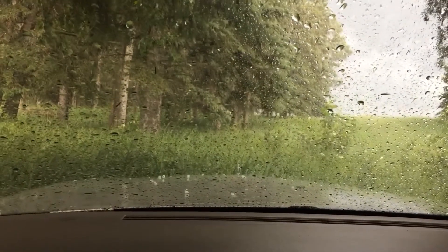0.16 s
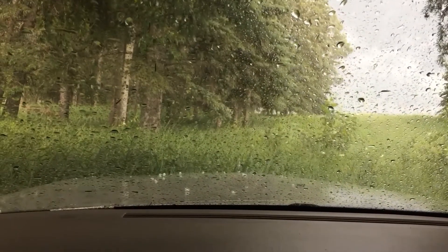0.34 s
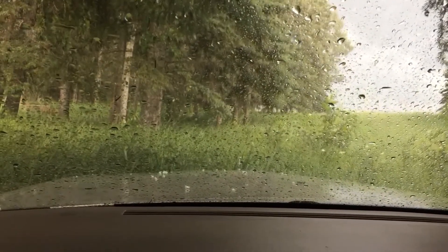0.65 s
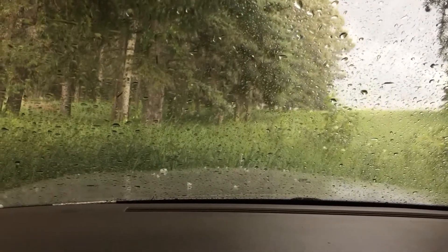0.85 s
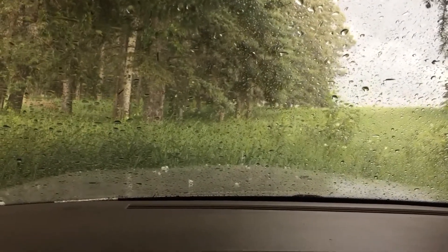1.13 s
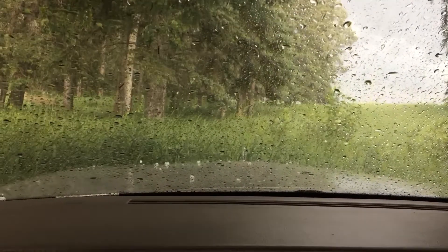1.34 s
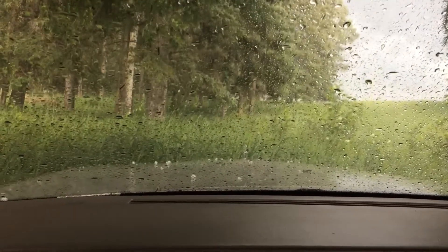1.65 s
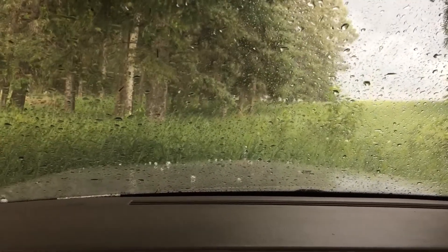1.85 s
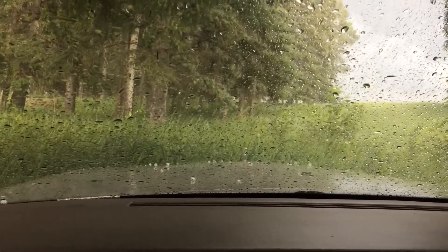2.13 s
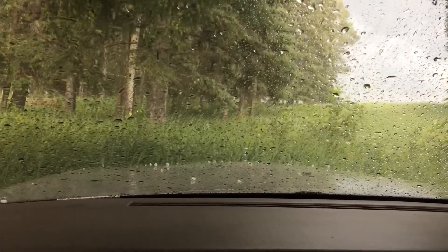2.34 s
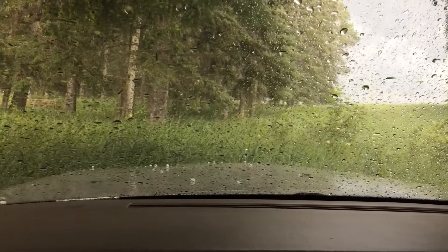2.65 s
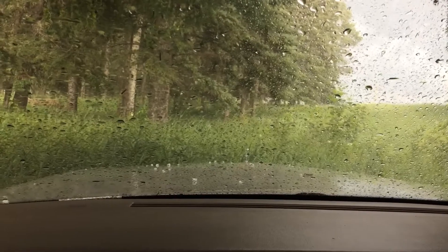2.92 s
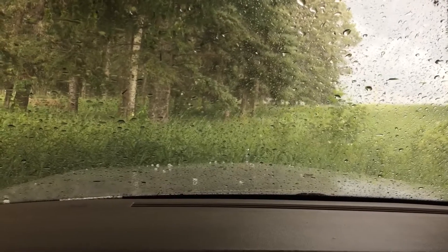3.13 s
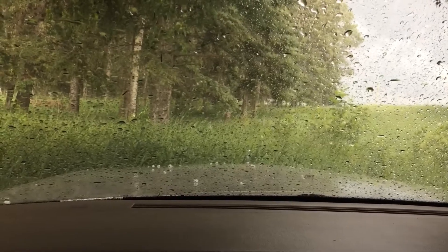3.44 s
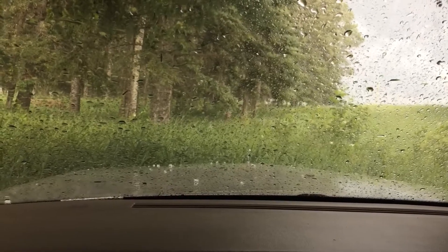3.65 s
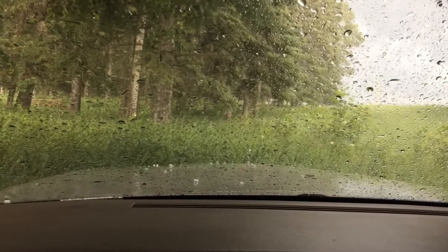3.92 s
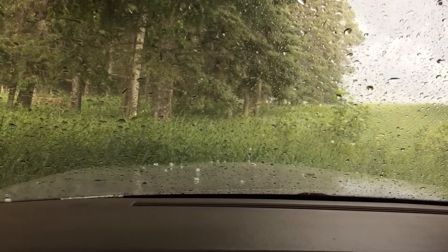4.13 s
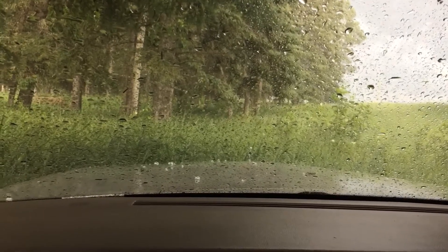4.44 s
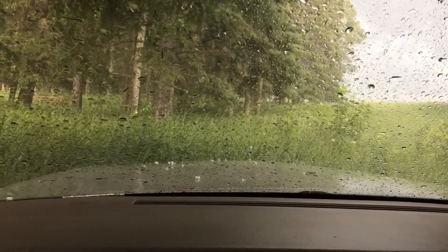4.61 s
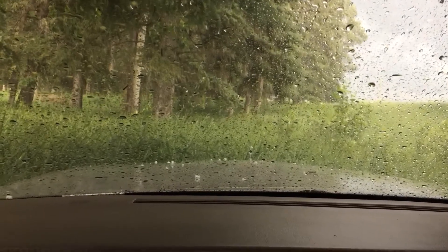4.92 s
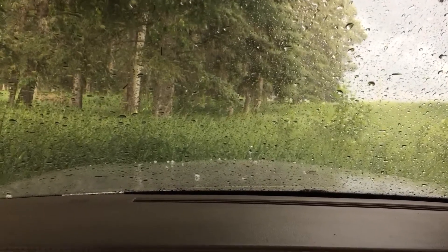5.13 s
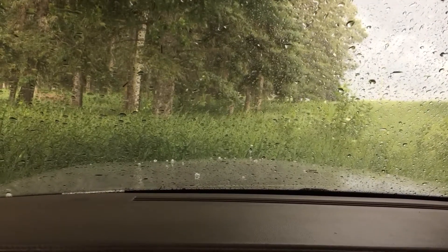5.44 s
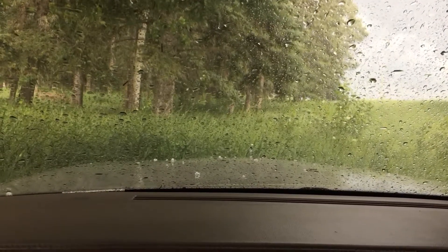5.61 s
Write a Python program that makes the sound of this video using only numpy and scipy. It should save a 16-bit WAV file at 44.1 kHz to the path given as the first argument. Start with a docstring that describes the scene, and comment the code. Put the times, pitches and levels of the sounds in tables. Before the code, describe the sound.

Heard from inside a parked car, hailstones hit windshield, hood and roof at uneven intervals, many each second. Bright glassy cracks and short ticks mix with hollow panel knocks and soft low thuds. Behind lies a faint rain patter. The clatter is dense for the first two and a half seconds, eases, picks up around four seconds, then thins to scattered taps. Close, dry cabin microphone.

```python
"""Hail on a parked car, heard in the cabin

Small far stones and drops patter behind: random fading taps of noise over a duller hush of rain.
Hard contacts of ice on glass tick as very short bright noise bursts. Each near stone rings a panel or
the glass in dense modes, made as bands of noise that die faster the higher they are, and sounds one
favoured mode as a sine note. Blows also boom in the shell, as a bank of low modes and a brief thud."""
import sys
import numpy as np
from scipy import signal
from scipy.fft import rfft, irfft, next_fast_len
from scipy.io import wavfile
from scipy.ndimage import uniform_filter1d

SR = 44100
rng = np.random.default_rng(int(sys.argv[2]) if len(sys.argv) > 2 else 0)


def store_wav(level_fs):
    """Save 16-bit WAV to argv[1]."""
    pcm = np.round(np.clip(np.atleast_2d(level_fs), -1, 1) * 32767)
    wavfile.write(sys.argv[1], SR, pcm.T.astype(np.int16))


N = 254456


def amp(db):
    """Decibel law: the amplitude ratio of a level in dB."""
    return 10 ** (np.asarray(db) / 20)


def unit(x):
    """Power normalisation: each row at rms 1."""
    return x / np.sqrt(np.mean(x ** 2, axis=-1, keepdims=True) + 1e-20)


def along(points, hz):
    """Logarithmic frequency scale: (Hz, value) points interpolated along it."""
    point_hz, value = np.transpose(points)
    return np.interp(np.log(hz + 1), np.log(point_hz + 1), value)


def filtered(x, response):
    """Linear filtering: the spectrum of x times a response of frequency."""
    m = next_fast_len(x.shape[-1] + 8192)
    spectrum = rfft(x, m) * response(np.fft.rfftfreq(m, 1 / SR))
    return irfft(spectrum, m)[..., :x.shape[-1]]


def placed(times, sounds):
    """Superposition: rows of sound add up on the time line."""
    out = np.zeros(N + sounds.shape[1])
    for start_s, sound in zip(times, sounds):
        out[round(start_s * SR):][:len(sound)] += sound
    return out[:N]


# Spectral weighting of the patter: pitch_hz, response_db
PATTER_SPECTRUM = [(12, -49), (20, -1.5), (130, 2.5), (172, -0.5), (248, -6.5), (422, -2), (718, -13),
                   (949, -8), (1260, -14), (2910, -15.5), (5000, -22), (11100, -33), (14700, -32),
                   (16000, -35)]
# Strength of the shower, as the rms between 300 and 6000 Hz: start_s, level_db
SHOWER_LEVEL = [(0.0, -54.5), (0.53, -54), (0.63, -55.5), (1.01, -57), (1.24, -54), (1.48, -48),
                (1.65, -52.5), (2.07, -46.5), (2.43, -52.5), (3.15, -61), (3.61, -55), (3.97, -52.5),
                (4.82, -59.5), (5.16, -59), (5.38, -56.5), (5.77, -59)]


def patter(spread_db, t60, bright_hz, hush_db, hush_hz):
    """Shot noise: many small far impacts, each a short fading tap, over a duller hush of rain."""
    struck = rng.random(N) < 110 / SR  # 110 hits per second on average
    hits = struck * amp(spread_db * rng.random(N) ** 2)
    fade = amp(-60 * np.arange(SR // 4) / SR / t60)
    puffs = unit(signal.fftconvolve(hits, fade)[:N])
    taps = filtered(puffs * rng.standard_normal(N), lambda hz: hz / (hz + bright_hz))
    hush = filtered(rng.standard_normal(N), lambda hz: amp(hush_db) / (1 + hz / hush_hz))
    sound = filtered(taps + hush, lambda hz: amp(along(PATTER_SPECTRUM, hz)))
    band = filtered(sound, lambda hz: (hz > 300) & (hz < 6000))
    level_db = np.interp(np.arange(N) / SR, *np.transpose(SHOWER_LEVEL))
    return amp(level_db) * sound / band.std()


# Hard contacts of ice on glass: start_s, level_db (peak), pitch_hz (centre of the burst)
GLASS_TICKS = [(0.5928, -31, 6120), (0.9108, -37, 4160), (0.967, -32, 3850), (1.024, -29.5, 4130),
               (1.068, -36, 3320), (1.104, -40, 3590), (1.213, -37, 6000), (1.359, -10, 2940),
               (1.415, -20.5, 3150), (1.498, -46, 3360), (1.6126, -14.5, 3190), (1.7132, -29, 3010),
               (1.8174, -27, 3480), (1.928, -32, 3400), (2.9325, -18, 4200), (3.2004, -21.5, 2930),
               (3.3067, -23, 3030), (3.4071, -32, 2930), (3.915, -29, 3050), (3.9787, -23, 2860),
               (4.0569, -10.5, 4000), (4.1063, -22, 3600), (4.5522, -19.5, 2900), (4.6124, -49, 3090),
               (4.767, -59, 2810), (4.969, -46, 3130), (5.026, -59, 2900), (5.0567, -40, 2930),
               (5.1442, -49, 3610)]


def ticks(t60, breadth):
    """Hard contact: a very short collision of ice on glass gives a bright, broad burst."""
    start_s, level_db, pitch_hz = np.transpose(GLASS_TICKS)[:, :, None]
    t = np.arange(SR // 50) / SR
    burst = rng.standard_normal((len(start_s), len(t))) * amp(-60 * t / t60)

    def resonance(hz):
        ratio = hz * pitch_hz / (pitch_hz ** 2 - hz * hz + 1j * breadth * hz * pitch_hz)
        return ratio ** 2

    burst = filtered(burst, resonance)
    return placed(start_s[:, 0], amp(level_db) * burst / np.abs(burst).max(axis=1, keepdims=True))


# Roof and cabin modes: pitch_hz, level_db (relative), t60_s
SHELL_MODES = [(36.6, -8, 0.16), (64.3, 0.5, 0.26), (88.4, -4.5, 0.56), (102.4, -2.5, 0.32),
               (117.64, 2, 0.51), (132.4, 0.5, 0.42), (154.9, 3.5, 0.39), (166.8, -0.5, 0.48),
               (186.6, -2.5, 0.35), (216.9, -5.5, 0.29)]


def shell(boom_db, boom_hz, damping, reach, thud_db, thud_t60):
    """Modal superposition: a blow drives the low modes, most near its own pitch, and thuds briefly there."""
    t = np.arange(int(.7 * SR)) / SR
    luck = rng.standard_normal((len(boom_db), 2, len(SHELL_MODES)))
    hz, db, t60 = np.transpose(SHELL_MODES)[:, :, None]
    nearness = 1 / (1 + (np.log(hz.T / boom_hz) / reach) ** 2)
    drive = (3.6 + nearness) * amp(1.9 * luck[:, 0])
    drive *= np.minimum(hz.T / boom_hz, 1) ** 0.51  # modes below the boom pitch are driven less
    modes = amp(db - 60 * t / t60) * (1 - np.exp(-t / 0.011)) * np.exp(2j * np.pi * hz * t)
    ring = np.imag(drive * np.exp(1j * luck[:, 1]) @ modes)  # phases differ with the place of impact
    ring /= np.sqrt(np.sum((drive * amp(db.T)) ** 2, axis=1, keepdims=True))
    thud = amp(thud_db - 60 * (t / thud_t60) ** 2) * (1 - np.exp(-t / 0.009)) ** 2.26
    thud *= np.sin(2 * np.pi * boom_hz * t)
    # lined panels lose their boom sooner: 350 dB/s more for each unit of damping above 1
    return amp(boom_db - 350 * t * (damping - 1)) * (ring + thud)


# Centres of the drum, knock, crack and sizzle ranges: pitch_hz
COLOUR_HZ = [400, 1050, 2900, 8500]
# Ring time of the panels before each blow's damping: pitch_hz, t60_s
PANEL_T60 = [(250, 0.24), (420, 0.15), (1100, 0.099), (2900, 0.065), (7700, 0.055), (15000, 0.038)]
# What the panels radiate: pitch_hz, level_db
RADIATION = [(200, -25), (280, -13.5), (1050, -13.5), (2900, -16), (8500, -11.5), (13000, -26),
             (16000, -18)]
# Modes that every blow favours: pitch_hz, width_hz, level_db (above the rest)
FAVOURED_MODES = [(326, 120, 8), (440.6, 104, 11), (598, 44, 6), (833, 12, 6), (995, 270, 6.5),
                  (1725, 26.7, 6), (2010, 36, 2.5), (2384, 11, 2), (3830, 1100, 3.5)]
LUMPS_DB = 2.5  # each place of impact favours its own clusters of modes


def panels(crack_db, colour_db, rise, damping, grit_db):
    """Bending waves in dense modes: they spread from the blow, so each band swells briefly, then dies."""
    count = len(crack_db)
    t = np.arange(next_fast_len(SR // 4)) / SR
    hz = np.fft.rfftfreq(len(t), 1 / SR)
    luck = rng.standard_normal((count, 2, len(t)))
    grit = unit(uniform_filter1d(luck[:, 1], size=10))
    noise = rfft(luck[:, 0] * amp(grit_db * grit))  # uneven arrivals make the ring spiky
    noise *= amp(sum(db / (1 + (2 * (hz - c) / w) ** 2) for c, w, db in FAVOURED_MODES))
    places = rng.standard_normal((count, 64))
    lump_axis = 10 * np.log(hz / 150 + 1)
    noise *= amp(LUMPS_DB * np.array([np.interp(lump_axis, np.arange(64), row) for row in places]))
    rings = np.zeros((count, len(t)))
    step = np.log(2) / 2  # half an octave
    for centre in 240 * np.exp(step * np.arange(13)):
        window = np.clip(1 - np.abs(np.log(hz / centre + 1e-9)) / step, 0, 1)
        band = irfft(noise * window, len(t))
        swell = (1 - np.exp(-t / (rise + 1.32 / centre))) ** 0.95
        fall_db = -60 * t * damping / along(PANEL_T60, centre)
        shape = swell * (amp(fall_db) + amp(-35 + 1.08 * fall_db))  # the weak part falls a little faster
        shape /= shape.max(axis=1, keepdims=True)
        # the random noise does not alter the energy of a blow
        even = np.linalg.norm(shape, axis=1) / np.linalg.norm(shape * band, axis=1)
        tint_db = [along(list(zip(COLOUR_HZ, row)), centre) for row in colour_db]
        gain = even * amp(crack_db + tint_db + along(RADIATION, centre))
        rings += gain[:, None] * shape * band
    return rings


def notes(db, hz, rise, damping):
    """A single damped mode: the one that the place of impact favours most."""
    t = np.arange(SR // 5) / SR
    fall = amp(-60 * t * damping / (0.62 * along(PANEL_T60, hz)))
    shape = (1 - np.exp(-t / rise)) * fall
    return amp(db) * shape / shape.max(axis=1, keepdims=True) * np.sin(2 * np.pi * hz * t)


# Near stones: start_s, crack_db (before radiation), boom_db, body_db, sizzle_db (all three above the crack),
# boom_hz, note_hz, rise_ms
STONES = [(.010, -47, 13, 15.5, -2, 141, 740, 1.3), (.036, -44.5, 13, 7.5, -15, 175, 840, 1.7),
          (0.118, -41.5, -2, -32, -9, 128, 3300, 3), (0.172, -31.5, -3, -5.5, -41, 142, 1040, 0.76),
          (.229, -16, -12.5, -8, -10, 149, 2050, 3.4), (.258, -28, 4.5, -6, -2, 141, 1155, 3.2),
          (.328, -51, 0, 1, 2, 157, 794, 2.5), (0.379, -31.5, -4.5, -4, -3.5, 97, 750, 3.6),
          (.447, -35, -7.5, -3, -17, 220, 980, 1.9), (.481, -30.5, -6, -5, -1, 129, 1020, 8.1),
          (.522, -28.5, -34, -12.5, -4.5, 109, 2160, 10), (0.541, -6.5, -50, -20, -25.5, 125, 2220, 1.9),
          (.625, -33, 7.5, -23, -10, 95, 3670, 8.2), (.638, -13, -27, -12.5, -10.5, 149, 3000, 0.62),
          (0.701, -11, -8.5, -9, -10, 135, 758, 4), (.754, -31.5, 5, -1, -19, 132, 840, 1.3),
          (.802, -34.5, 2, -5, -14, 135, 870, 0.98), (.899, -41.5, -22, -14, -2, 159, 1690, 3.7),
          (0.912, -21, -37, -16.5, -14.5, 97, 4190, 0.62), (.965, -39.5, -18, -26, -5, 148, 3820, 1.9),
          (1.023, -40, -3, -38, -7, 92, 4380, 1.4), (1.076, -29, -23, -10, -21, 170, 1080, 16),
          (1.101, -35.5, -33, -26, -16, 137, 1090, 3), (1.158, -34.5, -8, -14, -3, 92, 1320, 2.6),
          (1.257, -19.5, 1.5, -4, -27, 175.4, 832, 25.7), (1.320, -13.5, -1.5, -8, -18.5, 129, 830, 0.53),
          (1.356, -17, -0.5, -8, -22, 142, 3870, 3.3), (1.372, -21.5, 3.5, 1, -6.5, 125, 1005, 1.1),
          (1.415, -27.5, 0, -4.5, -10, 113, 3180, 2.8), (1.461, -20.5, -12, -12, -16.5, 161, 806, 0.57),
          (1.498, -53, 17, -3, -19, 134, 810, 1.9), (1.529, -33, -22, -4, 2, 137, 2080, 5.4),
          (1.614, -23, -28, -11, -11, 100, 970, 0.53), (1.647, -25.5, -19, -22, -5, 139, 2460, 2.1),
          (1.660, -16, -5, -8, -9, 145, 850, 3.7), (1.714, -38, 4, -3, -2, 164, 980, 2.9),
          (1.776, -24, -43, 2.5, -6, 111, 1128, 1.2), (1.815, -18.5, -39, -24, -13, 117, 3460, 0.91),
          (1.861, -21.5, -6.5, -4, -20, 157, 1330, 6.4), (1.927, -46, -25, -16, -19, 143, 3700, 2.6),
          (1.951, -23, -25, -1, -17, 127, 950, 3.8), (1.993, -18.5, -4, -8.5, -18, 167, 2320, 1.9),
          (2.020, -13.5, -7, -4.5, -13.5, 147, 1062, 3.4), (2.094, -35, 5, -3, -6.5, 139, 880, 6.7),
          (2.148, -49, -5, -19, 12, 156, 1170, 1.8), (2.174, -16.5, -0.5, -3.5, -6, 130.5, 790, 4.8),
          (2.227, -10.5, -8.5, -10.5, -20.5, 166, 1173, 1.1), (2.28, -35, 11, -2, -5, 149, 880, 2.2),
          (2.350, -41, 10.5, -7, -3, 93, 815, 6.9), (2.436, -24, -32, -5.5, -9.5, 153, 1414, 5.1),
          (2.492, -39.5, -1, -11, -5, 150, 1410, 5.7), (2.544, -51, 8, 1.5, -17, 171, 970, 4.9),
          (2.644, -43, 0.5, -3.5, -13, 158, 1160, 1.9), (2.712, -18.5, -4.5, -10, -16, 143.5, 1730, 12),
          (2.815, -35, -9, -10.5, -9, 130, 755, 1.6), (2.887, -39, 1.5, -5, -9, 131, 1220, 7.8),
          (2.931, -14, -19.5, -12.5, -21, 174, 3040, 0.33), (3.019, -31.5, -8, -2, -15, 137, 1670, 5.6),
          (3.108, -43.5, -2, -15, 0.5, 98, 1010, 1.4), (3.198, -34, -10, -11, 0, 160, 2580, 3.6),
          (3.223, -19, -1.5, 2, -12, 143, 1690, 6.7), (3.306, -29.5, -14, -6, 0, 135, 2920, 0.67),
          (3.322, -28, -8.5, -6, -1, 159, 777, 0.7), (3.371, -26.5, -12, -13, -18, 186, 3020, 2.3),
          (3.404, -32, -24, -23, -6, 175, 3140, 2.1), (3.464, -28, -14.5, -18, -12.5, 138, 1400, 2.2),
          (3.501, -37.5, -7, -35, -5.5, 100, 3580, 5.4), (3.627, -38.5, -2.5, 11, -3, 187, 1160, 0.69),
          (3.699, -29, -6, -8.5, -32, 145, 1310, 5.2), (3.729, -28, 13.5, 6, -19, 157, 790, 8),
          (3.807, -45, 19, 7, 0, 150, 756, 3.8), (3.821, -28, 1.5, -3, -29, 163, 1504, 4),
          (3.881, -40, 2, -10, -11, 141, 780, 26), (3.911, -14, -23, -15, -16.5, 160, 3520, 0.71),
          (3.977, -18.5, -36, -21, -6.5, 108, 2770, 0.54), (4.014, -29.5, -26, -12.5, -13, 148, 1120, 3.4),
          (4.058, -25.5, -19, -8.5, 0.5, 221, 4140, 0.87), (4.106, -23, -1.5, -8, -8, 147, 3000, 6.7),
          (4.118, -21, -11.5, -3.5, -5.5, 143, 956, 1.3), (4.162, -32, 5, -1, -17, 171, 1440, 1.1),
          (4.213, -32.5, -4.5, 2.5, -20, 170, 1138, 4.7), (4.302, -46, 10.5, -1, -36, 184, 740, 1.7),
          (4.324, -47, -17.5, 2, -36, 132, 1460, 2), (4.352, -48, -14.5, 8.5, -13, 127, 930, 2.1),
          (4.396, -35, -3, 0, -6, 150, 970, 1.3), (4.407, -13, -27.5, -22.5, 4, 175, 3390, 3.2),
          (4.475, -41, 30, 3.5, -11.5, 178, 1000, 13.5), (4.551, -29, 4, -8.5, -20, 150, 786, 0.33),
          (4.612, -38, -4, -13.5, -19, 155, 3100, 1.8), (4.675, -43, 7, -13, -21, 164, 1140, 3.7),
          (4.764, -47.5, -12, -6, -44, 151, 1570, 1.4), (4.786, -33.5, -12, -0.5, -10, 220, 1028, 11),
          (4.833, -33.5, -9, -5.5, -16.5, 171, 933, 2.7), (5.147, -43.5, 5, -7, -16, 146, 3480, 6.2),
          (5.170, -37, -1, -8.5, -13, 143, 1140, 2), (5.188, -33.5, -17, -18, -21, 137, 830, 1.3),
          (5.240, -35, -1.5, -6.5, -11, 180, 935, 3), (5.280, -39, 9, -3.5, -17, 167, 747, 4.6),
          (5.353, -51.5, 16, 2, -19, 151, 1040, 18), (5.444, -49, 8, 3, -18, 131, 1010, 1.6),
          (5.486, -16.5, -49, -17, -6, 108, 3484, 1.3), (5.561, -18.5, -25, -22.5, -2, 137, 3520, 1.8),
          (5.640, -46, -1, 4.5, 5, 99, 1004, 8.4), (5.724, -27.5, -7, -19.5, -0.5, 149, 3700, 1.8)]
# Glass has little body and dies fast: body_db, damping (factor on the rate of decay)
BODY_DAMPING = [(-27, 1.22), (-12, 1.33), (-13, 0.83), (1, 0.77)]
# Damping of the boom: boom_hz, damping (1 adds no loss)
BOOM_DAMPING = [(95, 1.01), (130, 1.076), (160, 1.13), (185, 1.6), (220, 0.71)]
# Note against the blow's colour at its pitch: pitch_hz, level_db
NOTE_LEVEL = [(750, -12), (1100, -10), (1700, -7), (2200, -11), (3000, -15), (4200, -3)]
DRUM_DB, KNOCK_DB = -2, 2.5  # above the body
DRUM_FOLLOWS_BOOM, THUD_FOLLOWS_BOOM = 0.3, 0.1  # dB per dB; a blow that is mostly boom is a compact thud
FAINT_DAMPING = 0.0057  # added damping per dB of crack below -25.5 dB, taken off above it
BOOM_LAG = 0.24  # the shell answers this many rise times after the contact


def stones():
    """Impact excitation: every near stone rings panel and shell; blows with little body die sooner."""
    start_s, crack_db, boom_db, body_db, sizzle_db, boom_hz, note_hz, rise_ms = np.transpose(STONES)
    drum_db = body_db + DRUM_DB + DRUM_FOLLOWS_BOOM * (boom_db - body_db)
    colour_db = np.transpose([drum_db, body_db + KNOCK_DB, 0 * start_s, sizzle_db])
    damping = np.interp(body_db, *np.transpose(BODY_DAMPING)) - FAINT_DAMPING * (crack_db + 25.5)
    damping = np.clip(damping, .3, 4)[:, None]
    rise = rise_ms[:, None] / 1000  # seconds
    ring = panels(crack_db, colour_db, rise, damping, grit_db=2.5)

    tint_db = [along(list(zip(COLOUR_HZ, row)), hz) for row, hz in zip(colour_db, note_hz)]
    note_db = crack_db + along(NOTE_LEVEL, note_hz) + tint_db
    note = notes(note_db[:, None], note_hz[:, None], rise, damping)

    boom_damping = np.clip(along(BOOM_DAMPING, boom_hz), .4, 4)[:, None]
    thud_db = 1.5 + THUD_FOLLOWS_BOOM * boom_db[:, None]
    boom = shell((crack_db + boom_db)[:, None], boom_hz[:, None], boom_damping,
                 reach=0.42, thud_db=thud_db, thud_t60=0.066)
    boom_start_s = start_s + BOOM_LAG * rise[:, 0]
    return placed(start_s, note) + placed(start_s, ring) + placed(boom_start_s, boom)


def scene():
    """Superposition of the far patter, the ticks on glass and the near stones."""
    far = patter(spread_db=16, t60=0.094, bright_hz=560, hush_db=-1.5, hush_hz=5000)
    glass = ticks(t60=0.007, breadth=0.92)
    return (far + glass + stones())[None]


TOP_HZ, SLOPE_HZ = 15500, 1100  # band limit, and the width of the 40 dB slope above it


def record(dry):
    """Band limitation: the microphone chain rolls off steeply above its limit, then passes nothing."""
    def response(hz):
        loss_db = -40 * np.clip((hz - TOP_HZ) / SLOPE_HZ, 0, 1)
        return amp(loss_db) * (hz < TOP_HZ + SLOPE_HZ)

    return filtered(dry, response)


dry = scene()
out = record(dry)
store_wav(out)
```